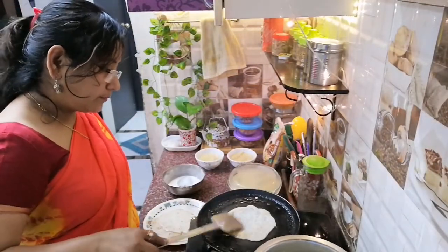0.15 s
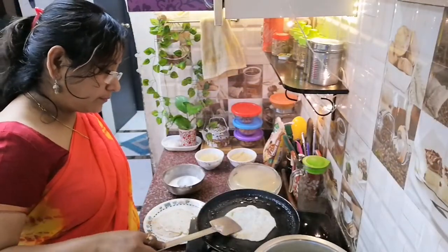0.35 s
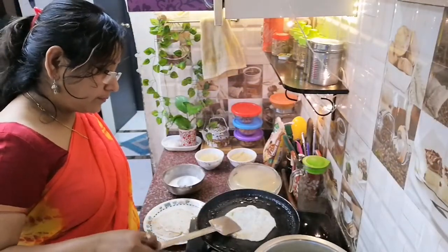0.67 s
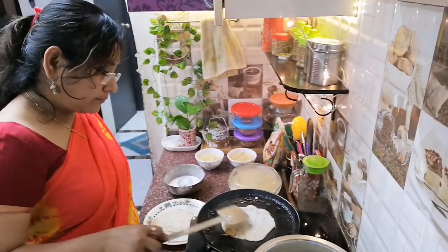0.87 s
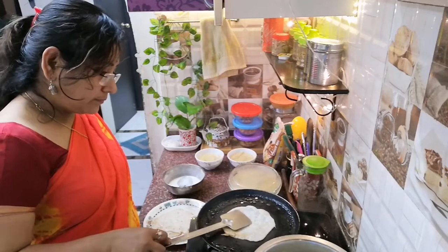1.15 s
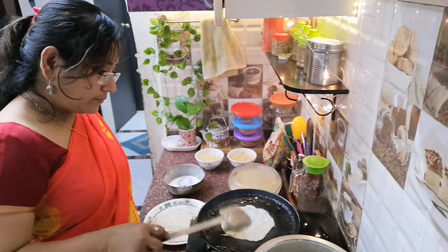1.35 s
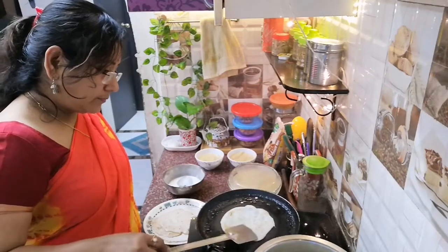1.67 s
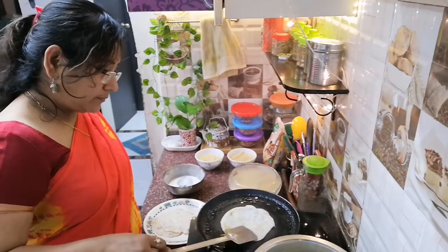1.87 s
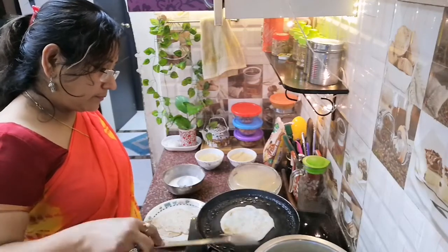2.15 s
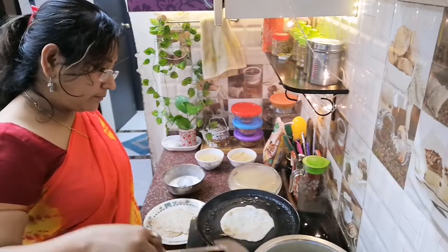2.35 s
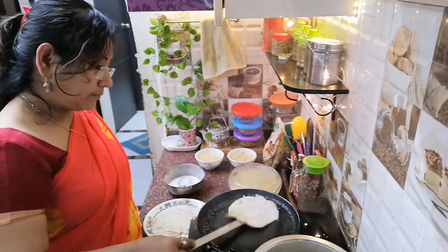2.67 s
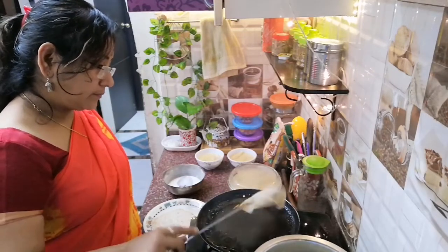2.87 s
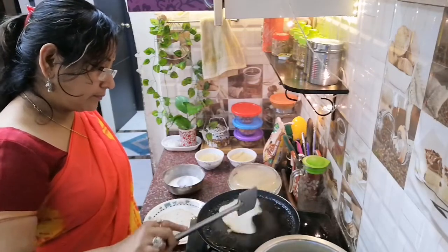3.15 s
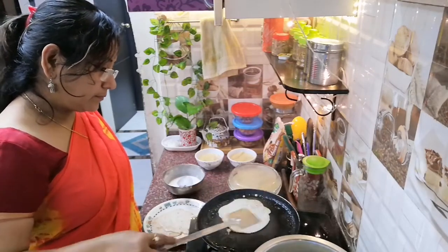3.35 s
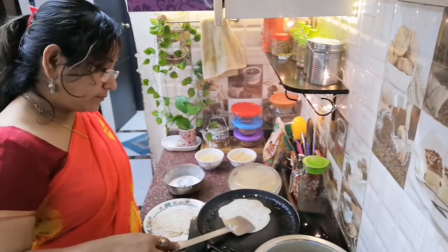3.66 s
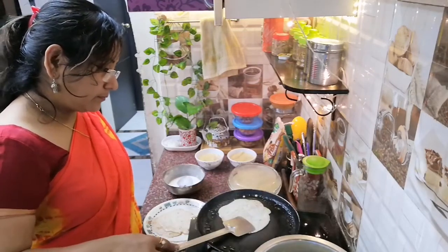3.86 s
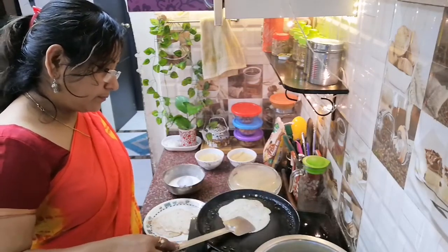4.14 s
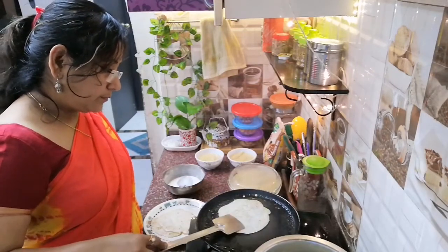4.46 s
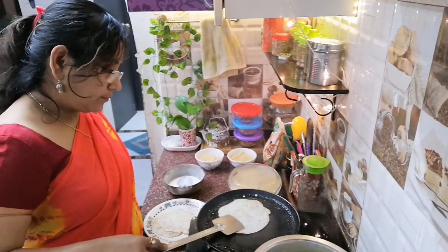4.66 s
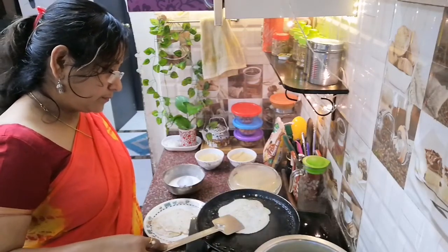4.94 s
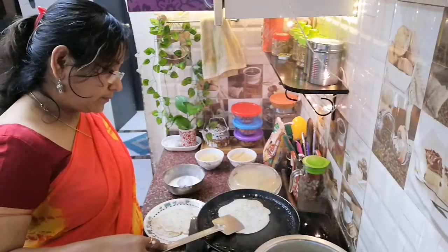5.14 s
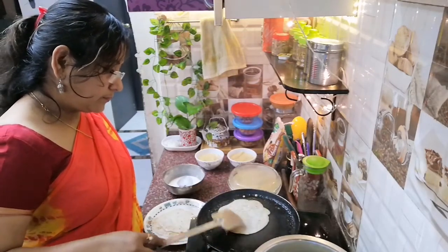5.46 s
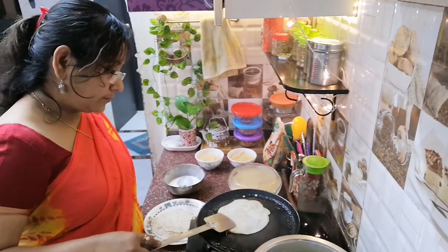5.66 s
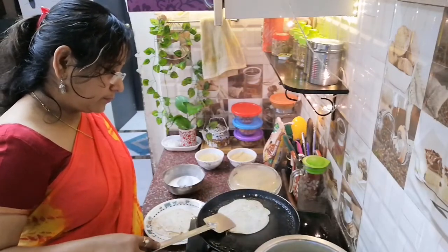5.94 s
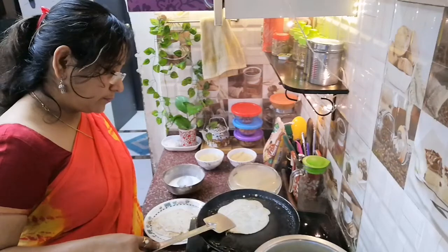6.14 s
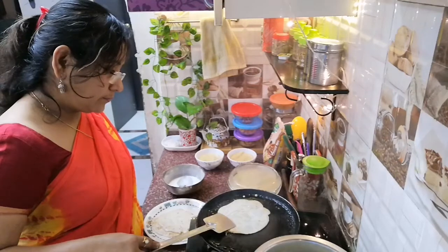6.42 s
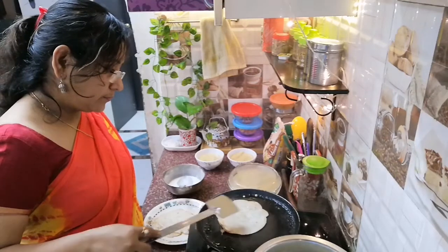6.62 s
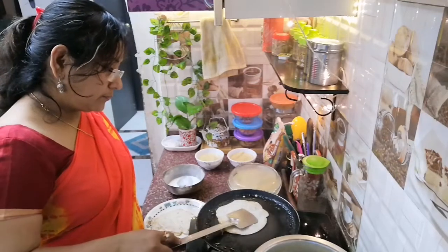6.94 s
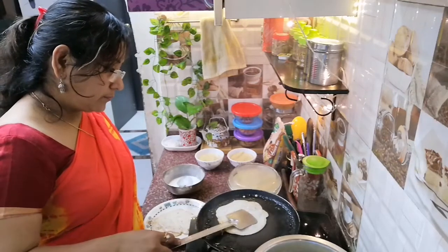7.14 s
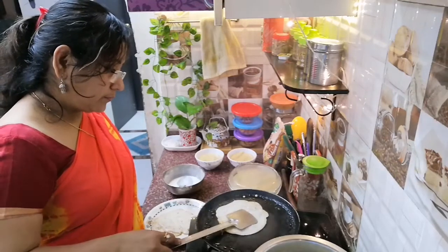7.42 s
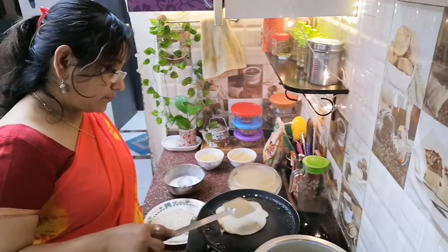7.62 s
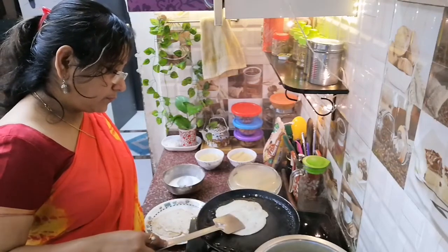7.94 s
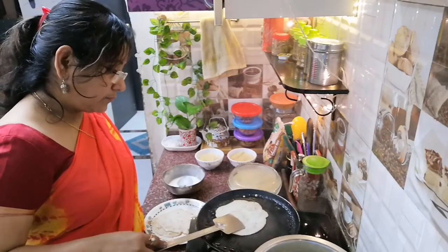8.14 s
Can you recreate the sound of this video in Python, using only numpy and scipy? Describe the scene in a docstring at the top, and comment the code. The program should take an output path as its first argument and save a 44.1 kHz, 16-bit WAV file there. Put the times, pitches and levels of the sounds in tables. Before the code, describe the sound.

Gritty spatula scrapes, hollow pan knocks, a sharp clack and soft steam hisses as flatbread is turned over a quietly fizzing hot pan.

```python
"""Flatbread in a hot pan

A wooden spatula works a flatbread in a non-stick pan, in a small tiled kitchen.
Random clicks make the scrapes, crumbs, sizzle and steam; gliding tones make the squeaks of the blade.
Short noise bursts and fading tones make the knocks of the pan on the stove grate, the clacks and the slaps.
A low hum and room rumble run below. Near the end all sound drops out for about a tenth of a second."""
import sys
import numpy as np
from scipy import signal
from scipy.fft import rfft, irfft
from scipy.io import wavfile
from scipy.ndimage import uniform_filter1d

SR = 44100
rng = np.random.default_rng(int(sys.argv[2]) if len(sys.argv) > 2 else 0)


def put_to_file(sound):
    """Save the sound as 16-bit audio at rate SR, in the file named by the first command-line argument."""
    columns = np.atleast_2d(sound).T  # one column per channel
    safe = np.clip(columns, -1, 1)
    whole_steps = np.round(safe * 32767)
    wavfile.write(sys.argv[1], SR, whole_steps.astype(np.int16))


N = 365588
TIME = np.arange(N) / SR
HIT = TIME[:SR // 2]  # the half second given to each blow
LEFT_RIGHT = np.array([[1], [-1]])


def undb(db):
    """Turn decibels into a gain."""
    return 10 ** (np.asarray(db) / 20)


def unit(x):
    """Scale to an rms of 1."""
    return x / np.sqrt(np.mean(x ** 2))


def strength(x, size=900):
    """Scale a blow so that its first 900 samples (20 ms) have an rms of 1."""
    return x / np.sqrt(np.mean(x[..., :size] ** 2))


def add(out, s, x):
    """Mix x in at time s, in seconds."""
    i = max(int(s * SR), 0)
    out[..., i:i + x.shape[-1]] += x[..., :N - i]


def colour(x, points):
    """Shape the tone to follow (Hz, dB) points, with a filter that never sounds before its input."""
    hz, db = np.transpose(points)
    grid = np.maximum(np.fft.rfftfreq(4096, 1 / SR), 1)
    curve_db = np.interp(np.log(grid), np.log(hz), db)
    # folding the cepstrum (the spectrum of the log response) makes the filter minimum-phase
    cepstrum = irfft(np.log(undb(curve_db)))
    half = len(cepstrum) // 2
    cepstrum[1:half] *= 2
    cepstrum[half + 1:] = 0
    response = irfft(np.exp(rfft(cepstrum)))
    response = response.reshape((1,) * (x.ndim - 1) + (-1,))
    return signal.fftconvolve(x, response, axes=-1)[..., :x.shape[-1]]


def walk(rate):
    """Wander smoothly by chance, with an rms of 1, heading for a new value 'rate' times a second."""
    k = max(int(SR / rate), 2)
    steps = np.repeat(rng.standard_normal(N)[:N // k + 1], k)
    return unit(uniform_filter1d(steps, k)[:N])


def grains(rate, spread_db, alike=0.65):
    """Random tiny clicks, a few much larger than the rest; each radiates unequally to the two sides."""
    size = undb(spread_db * np.minimum(rng.exponential(size=N), 5))
    sides = alike * rng.standard_normal(N) + rng.standard_normal((2, N))
    happens = rng.random(N) < rate / SR
    return unit(happens * size * sides)


def fade(t60):
    """A blow dies away exponentially, by 60 dB in t60 seconds."""
    return np.exp(-np.log(1000) * HIT / t60)


def ring(modes):
    """Fading tones; each blow lands on a different spot and loads the pan anew, so levels and pitches shift."""
    out = 0
    for hz, db, t60 in modes:
        weight = undb(db + 3 * rng.standard_normal())
        pitch = hz * (1 + .014 * rng.standard_normal())
        sign = rng.choice([-1, 1])
        out = out + sign * weight * fade(t60) * np.sin(2 * np.pi * pitch * HIT)
    return out


def burst(points, t60):
    """Many close modes that die together, made from fading noise."""
    return strength(colour(rng.standard_normal(len(HIT)) * fade(t60), points))


def gesture(start, attack, hold, release, change_db=0):
    """Rise, hold while the level drifts by change_db, then fall by 20 dB in each release time."""
    t = TIME - start
    # a power a little below 1 bends the rise slightly
    rise = np.clip(t / attack, 0, 1) ** 0.96
    drift_db = change_db * np.clip((t - attack) / hold, 0, 1)
    fall_db = 20 * np.maximum(t - attack - hold, 0) / release
    return rise * undb(drift_db - fall_db)


def kitchen(x, wet_db, t60, pan_db, lag_size=2):
    """The direct sound reaches the left port first, by lag_size samples; close tiles add a short, dense tail."""
    tail = rng.standard_normal((2, len(HIT))) * fade(t60) * (HIT > .0012)
    response = undb(wet_db) * tail / np.sqrt(np.sum(tail ** 2, axis=1, keepdims=True))
    response[0, 0] += 1
    response[1, lag_size] += 1
    heard = signal.fftconvolve(np.broadcast_to(x, (2, N)), response, axes=1)[:, :N]
    balance = undb(LEFT_RIGHT * pan_db / 2)
    return heard * balance / np.sqrt(1 + undb(wet_db) ** 2 / 2)


# Where the blade works in the pan. Each row: time in seconds, left minus right level in dB.
BLADE_PLACES = [(0.45, 4), (1.15, 8), (1.45, 6.5), (1.85, 2), (2.35, 2), (2.55, -1), (2.75, -2.5),
                (3.8, -3), (4.3, -7), (4.7, 0.5), (6.1, 0.5), (7.1, 0), (8.1, 0.5)]


def place():
    """Left minus right level in dB as the blade moves about the pan."""
    return np.interp(TIME, *np.transpose(BLADE_PLACES))


# Tone of the room's rumble. Each row: frequency in Hz, relative level in dB.
ROOM_TONE = [(15, -19.5), (28, -14), (42, 2.5), (62, -4.5), (100, -4.5), (150, -6), (190, -13), (240, -6),
             (330, -14), (480, -13), (620, -20.5), (1260, -23), (1650, -23), (2200, -39), (3200, -46.5)]
# Tone of the sizzle under the dough. Each row: frequency in Hz, relative level in dB.
SIZZLE_TONE = [(1180, -56), (2000, -6), (2360, -10), (2480, -7.5), (3080, -6), (3330, -7.5), (3630, -14),
               (4870, -16), (5130, -11), (5900, -7), (8550, -2.5), (10300, -10.5), (12800, -15),
               (15800, -21.5)]
HUM_HZ = 50


def background():
    """Moisture fizzes under the dough as random clicks; the room rumbles as noise and a low hum wavers."""
    flicker = undb(0.31 * walk(7.7))
    fizz = unit(colour(grains(rate=5000, spread_db=3.5) * flicker, SIZZLE_TONE))
    mid, side = colour(rng.standard_normal((2, N)), ROOM_TONE)
    # the two sides differ more towards the treble
    width = colour(side / np.std(mid), [(60, -14.0), (250, -6.5), (1000, 1.5)])
    swell = undb(.7 * walk(4))
    air = (unit(mid) + width * LEFT_RIGHT) * undb(-57.5) * swell
    hum = np.sin(2 * np.pi * HUM_HZ * TIME) * undb(-62.5 + 1.4 * walk(11))
    return kitchen(fizz * undb(-57.5), wet_db=1, t60=0.09, pan_db=1.5) + air + hum


# The pan knocks on the grate. Each row: start in seconds, rap level in dB before its parts are mixed,
# weight of the low thud against it in dB, hardness in dB (below 0 cushioned by the dough,
# above 0 bare wood on metal).
KNOCK_LIST = [(.045, -46, -3.5, 5.5), (.084, -53.5, 0.5, 1.5), (1.107, -36, -3.5, 7),
              (1.123, -43.5, 10, -15), (1.158, -45, -6, 2), (1.392, -42, -4, 6), (1.424, -37.5, -0.5, -1),
              (1.49, -44.5, 1, -5), (1.512, -40, -3.5, 3), (1.564, -50.5, 6, -13), (3.756, -41, -9, -7),
              (3.842, -42.5, -9.5, -11), (3.913, -45.5, -8, -20), (3.965, -49, -2, 3),
              (4.176, -52.5, -9, -10), (4.234, -45.5, 0, -3), (4.26, -40, 0.5, -7), (4.322, -44, -5, -0.5),
              (4.342, -43.5, -2.5, -13), (4.39, -49.5, 1, -10), (5.74, -63, 10.5, -11),
              (7.042, -37, -14, -14), (7.058, -33, -1.5, -18), (7.067, -42, -1.5, -17),
              (7.092, -39, -14, -5), (7.134, -44.5, -8, -4), (7.259, -54, 1, -6), (7.588, -45, 0.5, -6),
              (7.617, -33.5, -1.5, -6), (7.677, -42.5, -10, -6), (7.696, -39, -1.5, -4),
              (7.748, -48.5, 0.5, -24)]
# How the pan rings. Each row: usual frequency in Hz, usual relative level in dB, time to fade by 60 dB in seconds.
PAN_MODES = [(246, -10, 0.26), (304, -9, 0.28), (355.8, 3.5, 0.23), (468, 2, 0.23), (585, -13, 0.61),
             (639, -3.5, 0.27), (720, -12.5, 0.26), (863, 3.5, 0.37), (893, -10.5, 0.14), (1034, 0.5, 0.39),
             (1076, -5.5, 0.38), (1250, -19, .12), (1618, 13, 0.11), (1802, 6, 0.3), (1987, -26, 0.062),
             (2180, 5, 0.085), (2780, -62, 0.24)]
# Tone of the low thud. Each row: frequency in Hz, relative level in dB.
THUD_TONE = [(120, -48), (230, -7.5), (340, 9.5), (420, -0.5), (500, 4.5), (620, 9.5), (780, 2),
             (1100, -51.5)]
# Tone of the higher rap. Each row: frequency in Hz, relative level in dB.
RAP_TONE = [(600, -15.5), (880, 0), (1080, 0.5), (1400, -8), (1900, 0.5), (2400, -2.5), (3400, -5.5),
            (4400, -41)]
# Levels in dB at hardness 0: push and thud against the weight, contact tick against the rap level.
PUSH_DB, BODY_DB, CONTACT_DB = -5, 0.5, -10.5
PUSH_PER_HARDNESS = -0.33  # dB per dB: a soft blow pushes more


def knocks():
    """The pan tips onto the grate: a short push, a thud, a rap of higher modes and a small contact tick."""
    low, high = np.zeros(N), np.zeros(N)
    for s, db, weight_db, hard_db in KNOCK_LIST:
        body = strength(ring([m for m in PAN_MODES if m[0] < 800]))
        upper = strength(ring([m for m in PAN_MODES if m[0] >= 800]))
        push_hz = 450 * np.exp(0.2 * rng.standard_normal())
        push = np.sin(2 * np.pi * push_hz * HIT) * fade(0.024)
        push_gain = undb(PUSH_DB + PUSH_PER_HARDNESS * hard_db)
        thud = strength(burst(THUD_TONE, t60=0.1) + undb(-2) * body)
        add(low, s, undb(db + weight_db) * (push_gain * push + undb(BODY_DB) * thud))
        # a blow cushioned by the dough has little tick and a duller rap
        dull_db = .5 * min(hard_db - 13, 0)
        rap = burst(RAP_TONE, t60=0.034) + undb(-11.5) * upper
        rap = strength(colour(rap, [(1000, 0), (3500, dull_db)]))
        tick = undb(CONTACT_DB + hard_db) * burst(GRIT_TONE, t60=0.005)
        add(high, s, undb(db) * (undb(-1.5) * rap + tick))
    # the low modes of a wide pan reach the two ports out of step
    low_heard = kitchen(low, wet_db=-7.5, t60=0.24, pan_db=6, lag_size=8)
    high_heard = kitchen(high, wet_db=4.5, t60=0.15, pan_db=1.03 * place(), lag_size=5)
    return low_heard + high_heard


# Strokes of the blade. Each row: start, attack, hold and release in seconds, level in dB before mixing,
# change over the hold in dB, then the blade's ring and the low rubbing, in dB against that level before mixing.
STROKE_LIST = [(0.22, 0.06, 0.32, 0.12, -39.5, 0, -6.5, -8.5),
               (0.992, 0.086, 0.14, 0.22, -49, -0.5, -4.5, -0.5),
               (1.694, 0.15, 0.14, 0.068, -36.5, -5.5, -3.5, -10),
               (2.36, 0.036, 0.045, 0.13, -43.5, -0.5, -9.5, -6),
               (2.463, 0.086, 0.07, 0.11, -47.5, -1, 1.5, 2.5),
               (2.64, 0.042, 0.097, 0.075, -45.5, 1.5, -10, -10.5),
               (3.627, 0.069, 0.23, 0.23, -46.5, -6.5, -6.5, -4.5),
               (4.473, 0.083, 0.027, .15, -46.5, -0.5, -2, -6),
               (4.545, .1, 0.09, 0.82, -52, -0.5, -6.5, -8.5),
               (5.727, 0.036, 0.51, 0.29, -53, 7.5, -9.5, -14.5),
               (6.968, .012, 0.18, 0.43, -57.5, 6.5, -7, -2),
               (7.865, 0.11, 0.31, .3, -55.5, -3.5, -1.5, -2)]
# Tone of the coating's grain. Each row: frequency in Hz, relative level in dB.
GRIT_TONE = [(2240, -29.5), (3800, -8), (4010, -15), (4330, -14), (5060, -6), (5910, -2), (6270, -1),
             (7450, -5), (8650, -2.5), (9130, -3.5), (9810, -9), (10800, -13), (14900, -20.5),
             (15800, -40.5)]
# Tone of the blade's ring. Each row: frequency in Hz, relative level in dB.
BLADE_TONE = [(1200, -42), (2000, -8), (2600, -4), (2950, -2), (3350, 1), (3580, -2.5), (3850, -24.5),
              (4300, -17.5), (5600, -43.5)]
# Tone of the low rubbing. Each row: frequency in Hz, relative level in dB.
RUB_TONE = [(250, -19), (500, -7.5), (800, -6.5), (1100, 0.5), (1600, -0.5), (2150, 0), (2650, 3.5),
            (3100, -4.5), (4000, -37)]


def scraping():
    """The edge trips over the grain of the coating: dense clicks ring the pan skin and the blade; crumbs crackle."""
    gains = np.zeros((3, N))
    for start, attack, hold, release, db, change_db, blade_db, rub_db in STROKE_LIST:
        stroke = gesture(start, attack, hold, release, change_db)
        gains += np.outer(undb([db, db + blade_db, db + rub_db]), stroke)
    grip = undb(2.25 * walk(130) + 0.78 * walk(22))
    grit = unit(colour(grip * grains(rate=9000, spread_db=3.0), GRIT_TONE)) * undb(0.9)
    blade = unit(colour(grip * grains(rate=7000, spread_db=2.5), BLADE_TONE)) * undb(3)
    rub = unit(colour(grip * grains(rate=3700, spread_db=2.0), RUB_TONE)) * undb(2.0)
    # the edge crushes about 70 crumbs a second
    crumbs = unit(colour(grains(rate=70, spread_db=2.5), SNAP_TONE)) * undb(-9.5)
    scrape = gains[0] * (grit + crumbs) + gains[1] * blade + gains[2] * rub
    return kitchen(scrape, wet_db=0.0, t60=0.13, pan_db=place())


# The edge catches on crumbs, fat spits. Each row: start in seconds, level in dB before a common cut.
TICK_LIST = [(.235, -38), (.2644, -34), (.3812, -36), (.5874, -29), (1.7065, -35), (2.6756, -30),
             (2.761, -28), (3.1787, -25), (5.7222, -39), (5.97, -32), (6.0415, -30), (6.0766, -28),
             (6.145, -31), (6.2567, -33), (6.342, -31), (6.3945, -31.5), (6.4383, -38), (6.4824, -37.5),
             (7.1008, -35.5), (7.891, -38)]
# Tone of a sharp snap. Each row: frequency in Hz, relative level in dB.
SNAP_TONE = [(800, -19), (2000, -18), (3300, 5), (4200, -14), (6000, 5.5), (8600, 7), (10500, -7.5),
             (15500, -13)]


def ticks():
    """Single sharp snaps on the hot coating, each a very short noise burst."""
    out = np.zeros(N)
    for s, db in TICK_LIST:
        snap = strength(burst(SNAP_TONE, t60=.007))
        add(out, s, undb(db - 11.5) * snap)
    return kitchen(out, wet_db=0.5, t60=0.16, pan_db=place())


# The edge sticks and slips. Each row: loudest moment, rise and fall in seconds, slip rate in Hz,
# glide in octaves per second, level in dB before a common boost, octave above against it in dB, roughness 0 to 1.
SQUEAK_LIST = [(0.467, .08, 0.12, 1113, 0.5, -48.5, -5, 0.15),
               (0.568, .11, 0.088, 1580, 0.5, -52, -10, 0.38), (.585, .06, 0.065, 1090, 1, -52, -17, 0.2),
               (1.835, 0.099, 0.091, 1108, 0.05, -45.5, -1, .7),
               (1.91, .06, 0.11, 1008, -3.0, -41, -26.5, 0.4),
               (2.51, .09, 0.11, 1095, -.6, -59.5, 12.5, .3), (2.62, .09, 0.07, 1052, -0.7, -48, 6, .38),
               (6.58, 0.029, .03, 2030, 2, -66.5, -27.5, 0), (6.72, 0.079, .08, 1620, 0.8, -70, -24, 0.18)]


def chatter():
    """Under pressure the wood sticks and slips about a thousand times a second or more; each squeak glides."""
    out = np.zeros(N)
    jitter = .14 * walk(600)
    grip = undb(3.2 * walk(120))
    for s, rise, fall, hz, glide, db, octave_db, rough in SQUEAK_LIST:
        t = TIME - s
        rate = hz * 2 ** (glide * np.clip(t, -rise, fall)) * (1 + rough * jitter)
        phase = 2 * np.pi * np.cumsum(rate) / SR
        # 20 dB below the peak at one rise time before it and one fall time after it
        distance = np.minimum(np.maximum(-t / rise, t / fall), 4)
        swell = undb(db - 20 * distance ** 2)
        out += swell * (np.sin(phase) + undb(octave_db) * np.sin(2 * phase))
    # it radiates from the far side of the pan, so the ports hear it further apart in time
    return kitchen(out * grip * undb(6.0), wet_db=3, t60=0.1, pan_db=place(), lag_size=5)


# The blade strikes the bare pan. Each row: start in seconds, level in dB before a common cut.
CLACK_LIST = [(2.3445, -27), (2.3495, -20), (2.3525, -18), (2.356, -22)]
# Tone of the strike. Each row: frequency in Hz, relative level in dB.
CLACK_TONE = [(120, -41), (250, -9.5), (450, -4), (660, -2.5), (850, -9.5), (1900, -13.5), (2600, -2),
              (3150, -22), (3600, -6), (4200, -16.5), (5700, -4), (8700, 2), (9600, -8.5), (15800, -19)]
# Blade and pan ring together. Each row: usual frequency in Hz, usual relative level in dB,
# time to fade by 60 dB in seconds.
CLACK_RING = [(455, -8, 0.24), (630, -3.5, 0.47), (705, -18.5, .1), (2730, 11.5, .04), (3550, -5.5, .08),
              (3590, 5.5, 0.079), (5127, 0, 0.076), (5470, -3, 0.13), (6360, 0, 0.076),
              (8100, -14.5, 0.072), (8810, -7, 0.14)]


def clacks():
    """The blade lands hard and bounces within a few milliseconds; blade and pan ring on."""
    out = np.zeros(N)
    for s, db in CLACK_LIST:
        add(out, s, undb(db - 9) * burst(CLACK_TONE, t60=0.012))
    add(out, CLACK_LIST[0][0], undb(-31.5) * strength(ring(CLACK_RING)))
    return kitchen(out, wet_db=-3.0, t60=0.16, pan_db=-1.0)


# Steam escapes as the bread is lifted, lands or is pressed.
# Each row: start, attack, hold and release in seconds, level in dB.
PUFF_LIST = [(2.667, 0.038, 0.087, .05, -44), (3.146, .025, 0.075, 0.15, -41.5),
             (3.313, 0.024, .015, 0.11, -51), (4.51, .05, 0.35, 0.45, -53.5), (5.85, .15, .33, .15, -58)]
# Tone of the steam. Each row: frequency in Hz, relative level in dB.
STEAM_TONE = [(400, -34), (700, -9), (1100, -10), (1700, -13), (2400, -2.5), (3200, -1.5), (4400, -13),
              (6000, -1), (8600, 3), (10500, -4.5), (15500, -13)]


def steam():
    """The moist side sears on the hot metal: a rush of tiny bursts that dies away."""
    hiss = unit(colour(grains(rate=9000, spread_db=2.2), STEAM_TONE))
    rush = np.zeros(N)
    for start, attack, hold, release, db in PUFF_LIST:
        rush += undb(db) * gesture(start, attack, hold, release)
    return kitchen(hiss * rush, wet_db=-7.0, t60=0.083, pan_db=place() - 1.0)


# The turned bread lands, later steam spits from under it. Each row: start in seconds, level of the sharp part in dB,
# damp thud against it in dB, time to fade by 60 dB in seconds.
SLAP_LIST = [(3.175, -41, -5, 0.2), (5.532, -50.5, -26, 0.05), (5.546, -51, -17, 0.024)]
# Tone of the damp thud. Each row: frequency in Hz, relative level in dB.
DOUGH_TONE = [(200, -27), (600, 6), (1200, 8), (2400, -1), (4000, -3)]


def slaps():
    """Moist dough meets hot metal: a soft pat and a puff of steam, both short noise bursts."""
    out = np.zeros(N)
    for s, db, thud_db, t60 in SLAP_LIST:
        puff = burst(SNAP_TONE, t60)
        pat = undb(thud_db) * burst(DOUGH_TONE, t60)
        add(out, s, undb(db) * (puff + pat))
    return kitchen(out, wet_db=-2, t60=0.072, pan_db=place())


def scene():
    """Everything at the stove."""
    blade = scraping() + ticks() + chatter() + clacks()
    return background() + knocks() + blade + steam() + slaps()


# Each microphone port has its own resonance. Each row: frequency in Hz, left level in dB, right level in dB.
PORT_TONES = [(150, -3.5, -2.5), (356, -5, -1.5), (763, -3.5, 0), (1160, -7.5, -2), (1590, -3.5, -3.5),
              (2850, -6.5, -2), (5080, 3.5, 5), (6460, -8.5, 3.5), (6630, 0, 1.5), (7180, -4, 0.5),
              (8720, 2, -22.5), (9050, -2, -6.5), (11100, -3, -1.5), (15000, -1, 5.5)]
TOP_HZ = 15750  # the treble stops here


def record(dry):
    """The two ports colour the sound; it drops out for about a tenth of a second; the top is cut."""
    ports = np.array(PORT_TONES)
    heard = np.array([colour(side, ports[:, [0, k]]) for k, side in enumerate(dry, 1)])
    gate = undb(np.interp(TIME, [6.835, 6.855, 6.964, 6.976], [0, -55, -55, 0]))
    low_pass = signal.ellip(10, .2, 70, TOP_HZ, fs=SR, output="sos")
    return signal.sosfilt(low_pass, heard * gate)


dry = scene()
out = record(dry)
put_to_file(out)
```